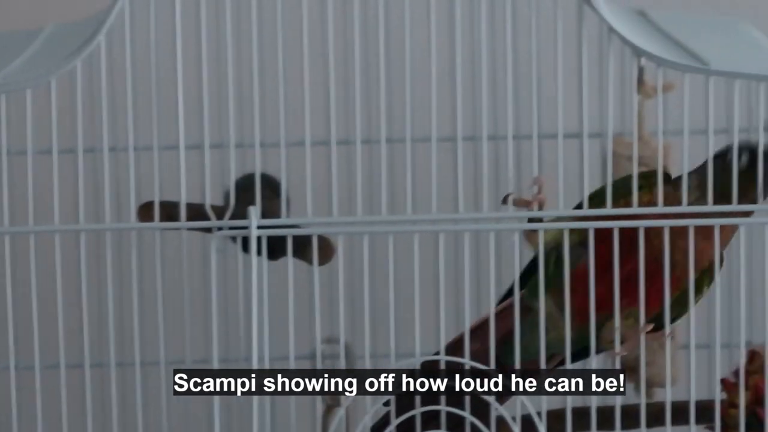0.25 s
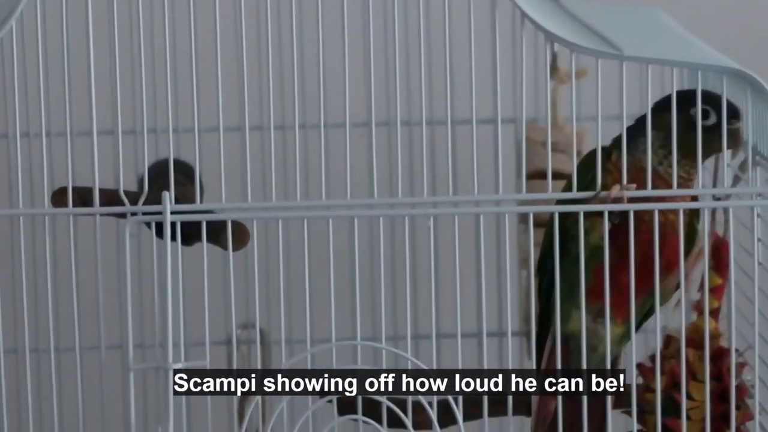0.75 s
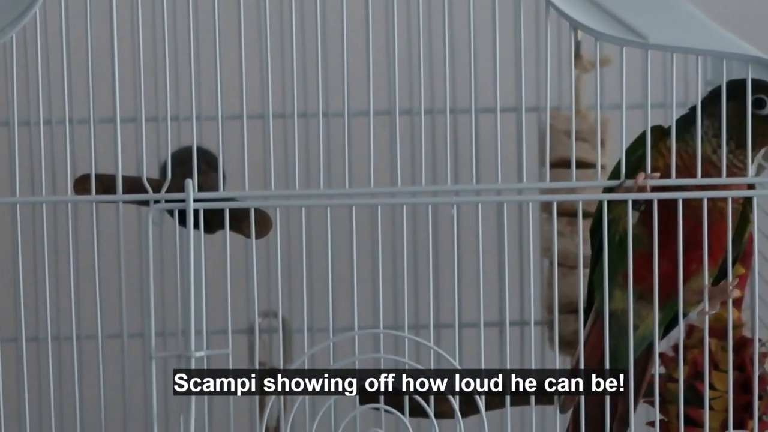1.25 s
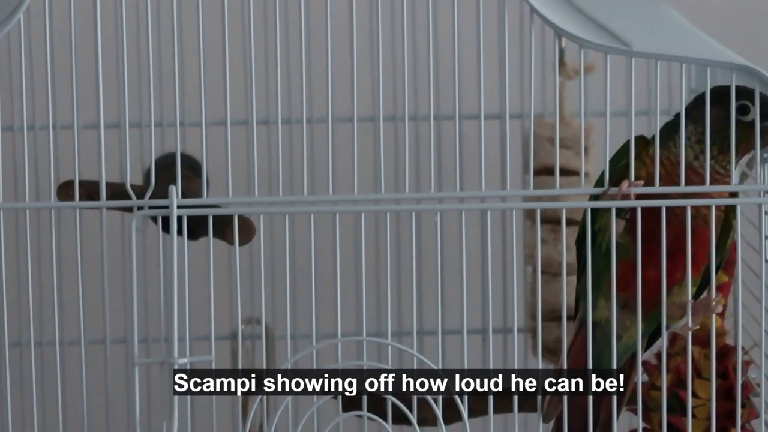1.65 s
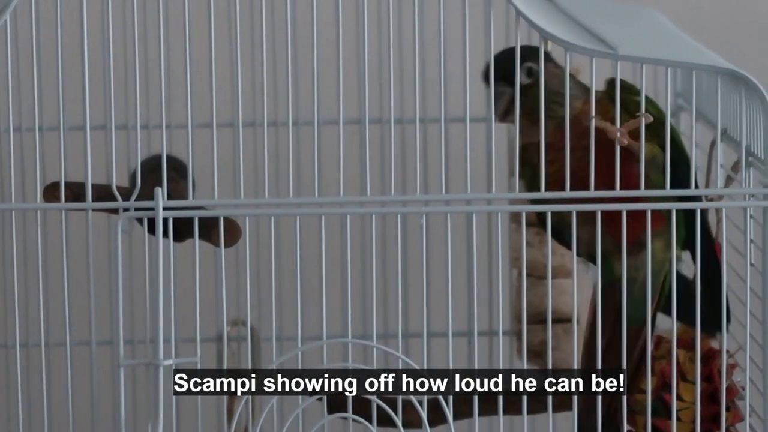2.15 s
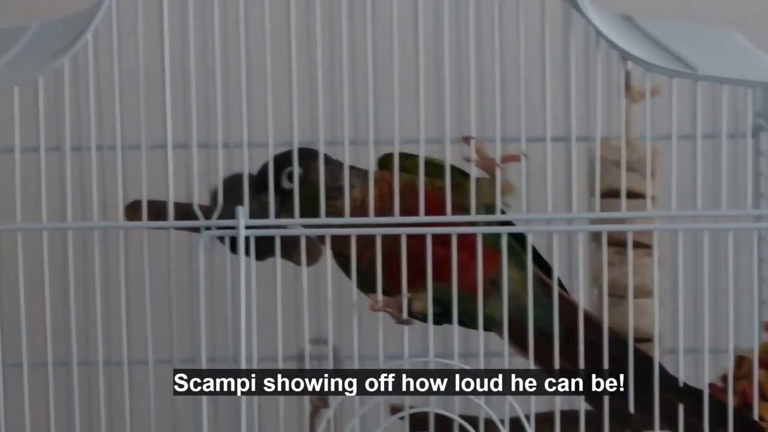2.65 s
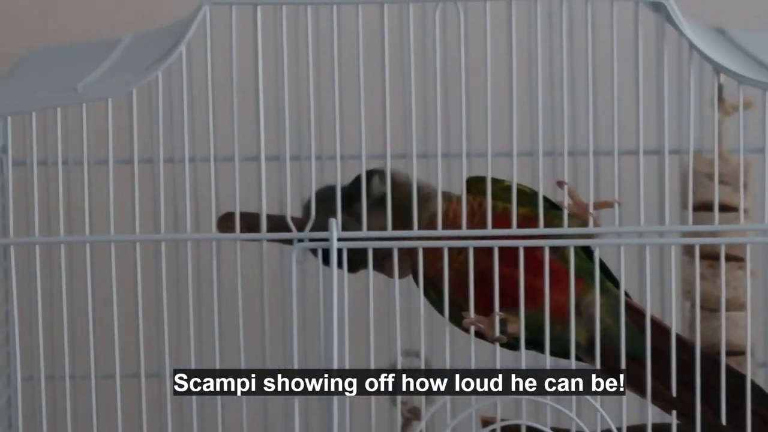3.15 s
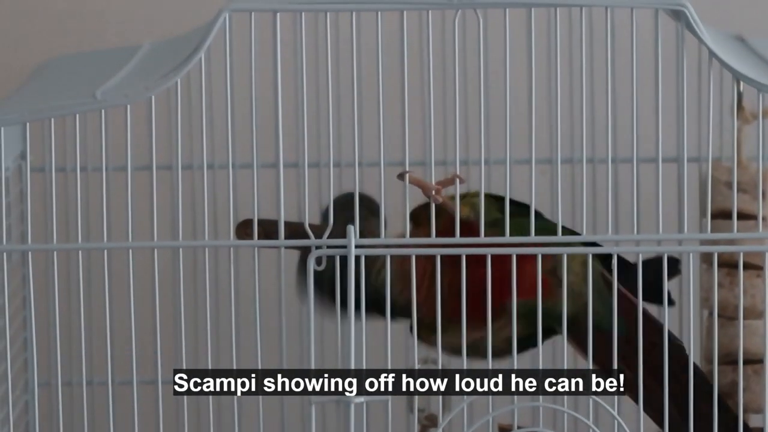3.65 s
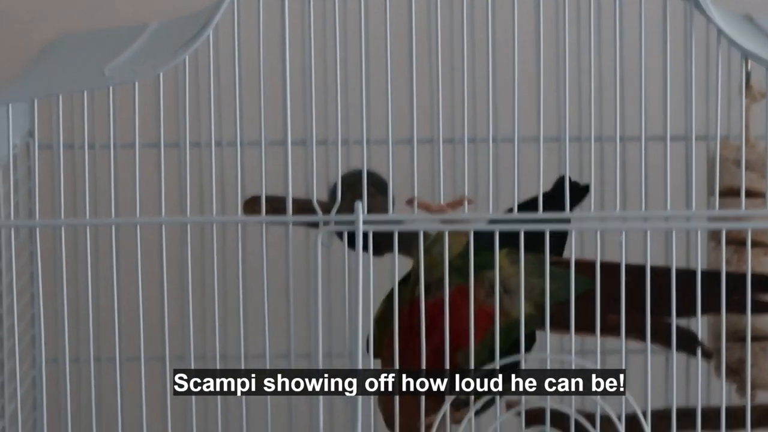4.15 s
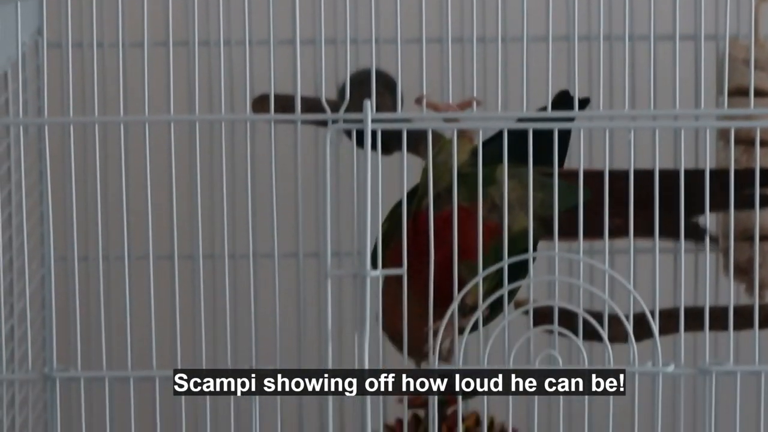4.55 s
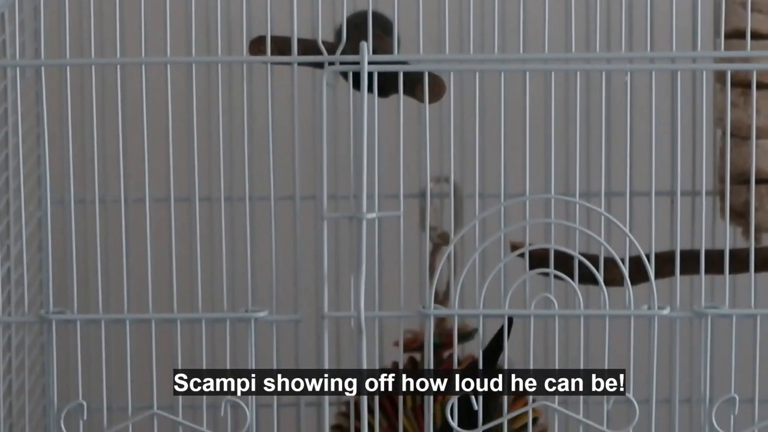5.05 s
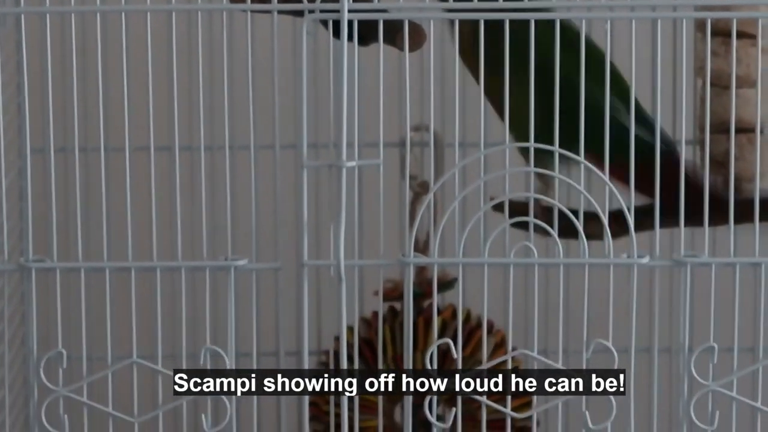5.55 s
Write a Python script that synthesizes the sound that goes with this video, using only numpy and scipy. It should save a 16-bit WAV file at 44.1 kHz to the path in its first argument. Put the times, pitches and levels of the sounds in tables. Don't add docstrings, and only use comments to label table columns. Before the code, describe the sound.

A small caged parrot gives one short, loud, raspy screech at about one second, mutters faintly, then fires off three quick screeches. Soft claw and feather scratches on the bars follow in a quieter gap, then a wheeze leads into four more shrill screeches to the end. Close stereo microphone in a bare, reverberant room with low rumble and mains hum.

```python
import sys
import numpy as np
from scipy import signal
from scipy.fft import rfft, irfft, next_fast_len
from scipy.io import wavfile
from scipy.ndimage import uniform_filter1d, minimum_filter1d, map_coordinates

SR = 44100
rng = np.random.default_rng(int(sys.argv[2]) if len(sys.argv) > 2 else 0)


def convert_level_to_amplitude(level_db):
    exponent = np.asarray(level_db, float) / 20
    return 10 ** exponent


def pcm_store(signal):
    levels = np.round(np.clip(np.atleast_2d(signal), -1, 1) * 32767)
    wavfile.write(sys.argv[1], SR, levels.astype(np.int16).T)


N = 255780


def evened(x):
    return x / np.sqrt(np.mean(x ** 2) + 1e-20)


def read(points, hz):
    f, value = np.transpose(points)
    return np.interp(np.log(hz + 1), np.log(f + 1), value)


def add(mix, start_s, sound):
    part = mix[round(start_s * SR):][:len(sound)]
    part += sound[:len(part)]


def wander(size, span):
    noise = rng.standard_normal(size + 400)
    return evened(uniform_filter1d(uniform_filter1d(noise, span), span)[200:-200])


def colour(x, gain):
    size = next_fast_len(x.shape[-1] + 4096)
    return irfft(rfft(x, size) * gain(np.fft.rfftfreq(size, 1 / SR)), size)[..., :x.shape[-1]]


def background():
    # time_s, gain_db, air_db, rumble_swell_db
    room_level = [(0, -14, -49, 5), (.2, 0, -46.5, -2.5), (.7, -1.5, -43, 3), (0.819, 8, -42, -1.5),
                  (1.0, 4.5, -42, -2), (1.15, -6, -49.5, 1.5), (1.4, -15, -55.5, 7.5),
                  (1.8, -5.5, -49.5, 7), (1.9, -20, -56.5, 5.5), (2.3, -17, -58, 2.5),
                  (2.7, -7.5, -58.5, -2), (3.25, 0, -53, -4), (3.3, -2.5, -47.5, 2.5),
                  (3.6, 0.7, -48.5, 1.5), (4.2, 2, -49.5, 0.8), (4.75, 4, -47, 4), (4.87, -5, -54.5, -0.5),
                  (5.8, -8, -49.5, 1)]
    # frequency_hz, density_db (per Hz)
    rumble_colour = [(12, -41.5), (20, -10.5), (70, 0), (92, 4.5), (199, -3), (261, 1), (270, 1),
                     (350, -31), (590, -120)]
    # frequency_hz, density_db (per Hz)
    air_colour = [(190, -28.5), (330, 4), (368, -1.5), (405, -3), (580, -8), (746, 0), (1020, -7.5),
                  (1120, -4), (2870, -21), (3260, -20.5), (4320, -21), (4970, -20.5), (5730, -25),
                  (12500, -30), (14000, -49)]
    # frequency_hz, correlation (-1 to 1)
    likeness = [(25, .99), (100, .95), (160, .3), (290, .8), (640, .65), (1410, .55), (3100, .37),
                (6820, .16), (15000, -.19)]
    hop, frames = 256, N // 256 + 5
    hz = np.fft.rfftfreq(1024, 1 / SR)
    time_s, *columns = np.transpose(room_level)
    frame_s = np.arange(frames) * hop / SR
    gain_db, air_db, swell_db = (np.interp(frame_s, time_s, c) for c in columns)
    rumble_db = -54 + 0.69 * gain_db + swell_db
    hum_db = -52.5 + gain_db

    a, b, c, d, patches = rng.standard_normal((frames, 513, 5)).T
    patches = evened(uniform_filter1d(uniform_filter1d(patches, 10, 0), 12, 1))
    same = np.clip(read(likeness, hz), -1, 1)[:, None]
    left = a + 1j * b
    right = same * left + np.sqrt(1 - same ** 2) * (c + 1j * d)
    tilt = np.clip(np.log2((hz + 1) / 1200) / 2, 0, 1)[:, None]
    rumble = convert_level_to_amplitude(read(rumble_colour, hz)[:, None] + rumble_db - 10.0)
    air = convert_level_to_amplitude(read(air_colour, hz)[:, None] + air_db - 13.5 + 0.5 * tilt + 1.0 * patches)
    spectra = np.array([left, right]) * np.hypot(rumble, air)
    noise = signal.istft(spectra, nperseg=1024, noverlap=768)[1][:, :N]

    hum_hz = 299.7 + 4 * uniform_filter1d(wander(N, 150), 3000)
    hum_level = convert_level_to_amplitude(np.interp(np.arange(N) / hop, np.arange(frames), hum_db))
    hum = np.sqrt(2) * np.sin(2 * np.pi * np.cumsum(hum_hz) / SR) * hum_level
    whine = convert_level_to_amplitude(-87) * np.sin(2 * np.pi * 13100 * np.arange(N) / SR)
    return noise + (hum + whine) * convert_level_to_amplitude([[-.1], [.1]])


def echoes(x):
    # frequency_hz, t60_s
    room_decay = [(1000, 0.48), (2600, 0.38), (4200, 0.43), (7000, 0.41), (12000, 0.29)]
    taps = np.zeros((2, SR))
    at = np.arange(130, SR - 20, 20)
    at = at + rng.integers(0, 20, (2, len(at)))
    np.put_along_axis(taps, at, rng.choice([-1., 1.], at.shape), 1)
    hz, t, z = signal.stft(taps, SR, nperseg=256)
    decay = convert_level_to_amplitude(-60 * t / read(room_decay, hz)[:, None])
    tail = signal.istft(z * decay, SR, nperseg=256)[1]
    return signal.fftconvolve(x[None], tail / np.linalg.norm(tail[0]), axes=1)[:, :N]


def claws():
    # start_s, peak_db, colour_hz, length_s
    touches = [(3.282, -41, 1087, 0.14), (3.3583, -45.5, 1140, 0.056), (3.6004, -48.5, 1105, 0.03),
               (3.644, -42, 1720, 0.044), (3.8135, -43, 1475, 0.065), (3.9624, -41.5, 1058, 0.048),
               (3.9894, -57, 1410, 0.065), (3.603, -51.5, 8800, 0.03), (3.652, -50, 4400, 0.035),
               (3.815, -53.5, 7000, 0.03), (4.7494, -24.5, 1940, 0.041)]
    out, t = np.zeros(N), np.arange(6000) / SR
    chance = rng.standard_normal((len(touches), 2, len(t)))
    for (start_s, peak_db, colour_hz, length_s), (grain, gate) in zip(touches, chance):
        shape = np.minimum(t / 0.0036, 1) * np.exp(-(t / length_s) ** 2)
        scratch = grain * convert_level_to_amplitude(4.0 * evened(uniform_filter1d(gate, 90))) * shape

        def bar_and_feather(f):
            bar = ((f / colour_hz) / (1 + (f / colour_hz) ** 2)) ** 2.6
            return bar + 0.012 * (f > colour_hz)

        scratch = colour(scratch, bar_and_feather)
        add(out, start_s, convert_level_to_amplitude(peak_db) * scratch / abs(scratch).max())
    thud_hz, thud_length_s = 69.2, 0.014
    swell = t / thud_length_s * np.exp(1 - t / thud_length_s)
    add(out, 4.765, convert_level_to_amplitude(-49) * np.sin(2 * np.pi * thud_hz * t) * swell)
    return out


def note(rows, rough, jitter=.005, flutter_db=2.8, rasp_db=-8.0, ring_db=-13.0):
    # frequency_hz, level_db
    throat = [(700, -50.5), (1300, -23), (1700, -34), (2150, -21), (2600, -4.5), (3750, -2.5), (4150, 1.5),
              (4600, -5.5), (6300, -3), (8400, -6), (9300, -11.5), (11000, -4), (12800, -18),
              (14500, -36.5)]
    band_hz = [3350, 3750, 4700, 5000, 7400, 7800]
    band_row = [0, 1, 1, 2, 2, 3]
    time_s, *columns = np.transpose(rows)
    t = np.arange(time_s[0] - .001, time_s[-1] + 0.0016, 1 / SR)
    hz, effort_db, low_db, high_db, top_db = (np.interp(t, time_s, c) for c in columns)
    tremble = 1 + jitter * (1 + 3 * rough) * wander(len(t), 120)
    angle = 2 * np.pi * np.cumsum(hz * tremble) / SR
    bands = np.array([low_db, 0 * t, high_db, top_db]) + effort_db
    out = np.zeros(len(t))
    for k in range(1, int(15500 / hz.max())):
        place = np.interp(k * hz, band_hz, band_row)
        band_db = map_coordinates(bands, [place, np.arange(len(t))], order=1)
        paired_db = -9.0 * (k % 2) * (k != 3) * (hz.mean() < 1200)
        shake_db = flutter_db * (0.5 + k / 8) * wander(len(t), 220)
        level = convert_level_to_amplitude(band_db + paired_db + read(throat, k * hz) + shake_db)
        blur = min(rough * (.6 + k / 8), .9)
        smear = wander(len(t), 18) + 1j * wander(len(t), 18)
        tone = np.exp(1j * (k * angle + 2 * np.pi * rng.random()))
        out += level * (tone * (np.sqrt(2 * (1 - blur ** 2)) + blur * smear)).real

    breath = rng.standard_normal(len(t))
    low_curve = [(900, -30), (1800, -6), (3000, 0), (5000, -6), (7000, -30)]  # Hz, dB
    top_curve = [(3500, -30), (5200, 0), (8000, -4), (12500, -7), (14500, -30)]
    low_rasp = evened(colour(breath, lambda f: convert_level_to_amplitude(read(low_curve, f))))
    top_rasp = evened(colour(breath, lambda f: convert_level_to_amplitude(read(top_curve, f))))
    windpipe_hz, windpipe_width_hz = 4031, 47
    ring = evened(colour(breath, lambda f: 1 / (1 + (2 * (f - windpipe_hz) / windpipe_width_hz) ** 2)))
    rasp = low_rasp * convert_level_to_amplitude(low_db - 4) + top_rasp * convert_level_to_amplitude(high_db + 4)
    out += rough * convert_level_to_amplitude(effort_db + rasp_db) * rasp
    out += ring * convert_level_to_amplitude(effort_db + ring_db)
    out *= convert_level_to_amplitude(1.8 * wander(len(t), 110))
    to_edge_s = np.minimum(t - t[0], t[-1] - t)
    return t[0], out * np.clip(to_edge_s / (.002 + .006 * rough), 0, 1)


def notes(syllables, end, swell_db, fade_db, hoarse, high_db, top_db, clear=.1):
    start, hz, end_hz, effort_db, beak_db = np.transpose(syllables)
    stop = np.append(start[1:], end)
    stop_db = np.append(effort_db[1:], effort_db[-1] + fade_db)
    stop_beak_db = np.append(beak_db[1:], beak_db[-1])
    stop_db[0], stop_beak_db[0] = effort_db[0] + swell_db, beak_db[0]
    ends = np.array([[start, hz, effort_db, beak_db], [stop, end_hz, stop_db, stop_beak_db]])
    ends = ends.transpose(2, 0, 1)
    beak = ends[..., 3]
    ends = np.dstack([ends, high_db + beak, top_db + 0.15 * beak])
    jump = abs(hz[1:] / end_hz[:-1] - 1) > .05
    jump[0] = True
    held = [part.reshape(-1, 6) for part in np.split(ends, np.flatnonzero(jump) + 1)]
    settle_s = .03
    return [(rows, clear + (hoarse - clear) * np.exp((start[0] - rows[0, 0]) / settle_s)) for rows in held]


def parrot():
    # start_s, pitch_hz,
    # end_pitch_hz, effort_db, beak_opening_db
    screech_syllables = [
        (0.983, 1166, 1184, -19, 1.5),
        (1.005, 1105, 1049, -28, -3.5),
        (1.035, 1022, 1023, -12.5, -7.5),
        (1.061, 1036, 1015, -17, -10.5),
        (1.085, 1531, 1515, -15.5, 2.5),
        (1.1, 1005, 1019, -21, -4.5),
                         (1.789, 1344, 1400, -43, 9.5), (1.81, 1036, 1059, -8, -9), (1.836, 1058, 1074, -20.5, 5),
            (1.859, 1073, 1092, -23.5, -6.5), (1.887, 1585, 1581, -18, -2.5), (1.91, 1601, 1629, -29, 10),
            (1.936, 1086, 1070, -28.5, 11), (1.958, 1065, 1091, -23.5, -6.5),
            (2.052, 1130, 1350, -37.5, 5.5), (2.067, 1032, 1003, -28.5, 0), (2.08, 1607, 1650, -21.5, -1.5),
            (2.1, 1047, 1069, -23, 3), (2.124, 1057, 1065, -20.5, -10), (2.152, 1472, 1515, -19.5, -5),
            (2.17, 1501, 1514, -26, 6), (2.195, 1026, 1013, -21.5, -2.5), (2.357, 1151, 1380, -35.5, 2.5),
            (2.385, 1330, 1400, -24.5, -3.5), (2.4, 1385, 1468, -24, 2.5), (2.422, 1043, 1027, -14, -8),
            (2.45, 1412, 1411, -16.5, -12.5), (2.476, 1420, 1477, -30, 7.5), (2.505, 1038, 1013, -27, 8.5),
            (2.53, 1020, 1023, -19.5, -12.5),
                         (4.778, 1420, 1369, -28, -6), (4.804, 1463, 1445, -21, 15), (4.837, 1443, 1427, -22.5, -6),
               (4.865, 1406, 1342, -23.5, -8.5), (4.889, 1284, 1305, -20.5, 1),
               (4.926, 1366, 1392, -19.5, -1), (4.948, 1366, 1390, -29.5, -9), (5.112, 1297, 1230, -22, -4),
               (5.131, 1203, 1264, -18.5, 3.5), (5.157, 1318, 1376, -18.5, 2.5),
               (5.182, 1383, 1398, -19.5, -6), (5.207, 1333, 1321, -19.5, 4),
               (5.232, 1307, 1382, -24, -3.5), (5.258, 1405, 1345, -13.5, -11),
               (5.449, 1281, 1294, -22.5, -6.5), (5.471, 1291, 1261, -16, 0.5), (5.5, 1343, 1410, -20, -4),
               (5.527, 1314, 1238, -18.5, -4.5), (5.558, 1292, 1324, -23, 4),
               (5.582, 1333, 1354, -19, -9.5), (5.7, 1403, 1413, -40, 8.5), (5.721, 1438, 1320, -23.5, 4.5),
               (5.747, 1321, 1438, -17, 2), (5.773, 1394, 1338, -15, -7)]
    mutter = [
        (1.42, 1047, 1119, -59.5, 4),
        (1.46, 1117, 1061, -50.5, -6.5),
        (1.49, 1090, 1104, -41.5, -6.5),
        (1.52, 1049, 1068, -51, 1),
        (1.554, 1071, 1056, -40, -6.5),
        (1.588, 1051, 1062, -46, -9),
        (1.64, 1050, 1063, -51.5, -17.5),
    ]
    wheeze = [
        (4.604, 2002, 1916, -51.5, 24),
        (4.624, 1916, 1964, -48, 30),
        (4.66, 2000, 2066, -52.5, 35),
        (4.696, 2066, 1994, -41, 20),
        (4.722, 1986, 1984, -37, 10),
        (4.749, 1984, 1916, -39.5, 20),
    ]
    undertone = [
        (0.976, 1343, 1320, -48, 8.2),
        (0.99, 1367, 1390, -33, 12),
        (1.015, 1380, 1550, -31.5, 13),
    ]
    # end_s, first_swell_db, last_fade_db, break_in_hoarseness (0-1), shrillness_db
    screeches = [
        (1.127, -1, -6, 0.3, 0.5),
        (1.98, 11, 0.5, 0.3, 0),
        (2.251, 3.5, -5.5, .35, -1.5),
        (2.56, 8, -9.5, .5, -2),
        (4.995, 10, -8.5, 0.1, 3),
        (5.284, 6.5, -21.5, .16, 0),
        (5.603, 5.5, 1, .13, 1),
        (5.8, -3.5, -6, 0.2, 3),
    ]
    # start_s, end_s, level_db
    gasps = [
        (1.745, 1.79, -44),
        (4.72, 4.78, -55),
        (5.099, 5.113, -42),
        (5.42, 5.449, -48),
    ]
    voice, begin = np.zeros(N), 0
    for end, *shape, shrill_db in screeches:
        rows_within = [row for row in screech_syllables if begin < row[0] < end]
        for rows, rough in notes(rows_within, end, *shape, high_db=-10 + shrill_db, top_db=-11.5 + shrill_db):
            add(voice, *note(rows, rough, jitter=.0055, rasp_db=-11.0, ring_db=-11.0, flutter_db=3.4))
        begin = end
    for rows, rough in notes(undertone, 1.04, 6.0, -5.0, .4, clear=.25, high_db=-24.0, top_db=-24.0):
        add(voice, *note(rows, rough, ring_db=-25.0))
    for rows, rough in notes(mutter, 1.69, 4.0, -12.0, .4, clear=.2, high_db=-20.0, top_db=-12.0):
        add(voice, *note(rows, rough, rasp_db=-2.0, ring_db=-25.0))
    for rows, rough in notes(wheeze, 4.778, 4.0, -30.0, .6, clear=.6, high_db=-31.0, top_db=-39.0):
        add(voice, *note(rows, rough, jitter=.015, rasp_db=-22.0, ring_db=-20.0))

    gasp_curve = [(600, -13.0), (2500, -4), (5000, -13.5), (14000, -17.0)]  # Hz, dB
    rasp = evened(colour(rng.standard_normal(N), lambda hz: convert_level_to_amplitude(read(gasp_curve, hz))))
    for start, end, db in gasps:
        size = round((end - start) * SR)
        add(voice, start, convert_level_to_amplitude(db + np.linspace(-3, 3, size)) * rasp[round(start * SR):][:size])
    return colour(voice, lambda hz: 1 / (1 + (900 / (hz + 1)) ** 8))


def scene(direct_db=-0.5, wet_db=-5.5):
    # frequency_hz, lead_rad
    port_lead = [(3000, 0.05), (4900, .6), (6500, .9), (8000, 1.4), (9500, 1.7), (13000, 1.9)]
    # frequency_hz, level_db
    echo_apart = [(1000, -10), (2500, -9.5), (4200, -4), (8000, 3), (13000, -1)]
    cage = parrot() + claws()
    common, apart = convert_level_to_amplitude(wet_db) * echoes(cage)
    near = convert_level_to_amplitude(direct_db) * cage + common
    apart = colour(apart, lambda hz: convert_level_to_amplitude(read(echo_apart, hz)))
    ports = []
    for side in (1, -1):
        shifted = colour(near, lambda hz: np.exp(side * .5j * read(port_lead, hz)))
        ports.append(shifted + side * apart)
    return np.array(ports) * convert_level_to_amplitude([[.2], [-.2]]) + background()


def band_limit(x):
    return signal.sosfilt(signal.butter(12, 15820, fs=SR, output="sos"), x)


def record(dry, ceiling=.79):
    peak = -minimum_filter1d(-abs(dry).max(0), 401)
    held = dry * uniform_filter1d(np.minimum(ceiling / (peak + 1e-9), 1), 200)
    return band_limit(held)


dry = scene()
out = record(dry)
pcm_store(out)
```